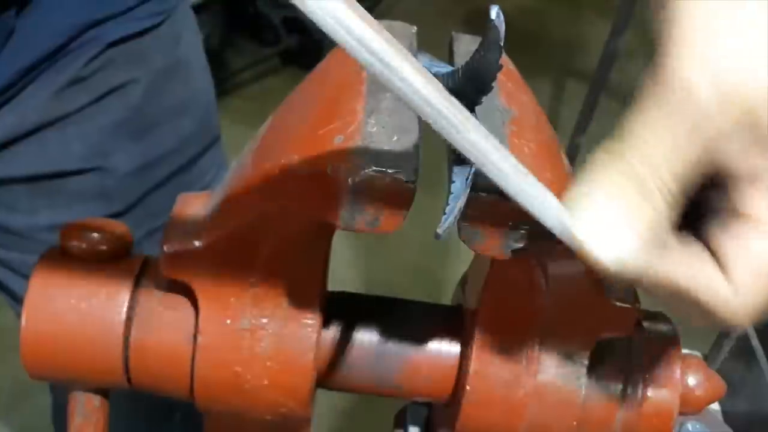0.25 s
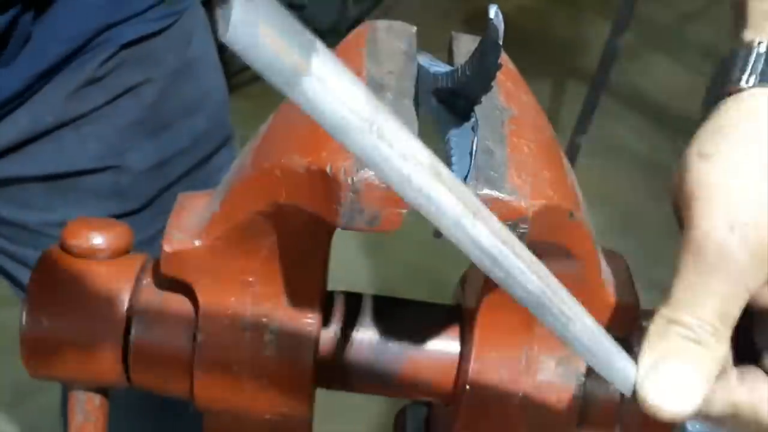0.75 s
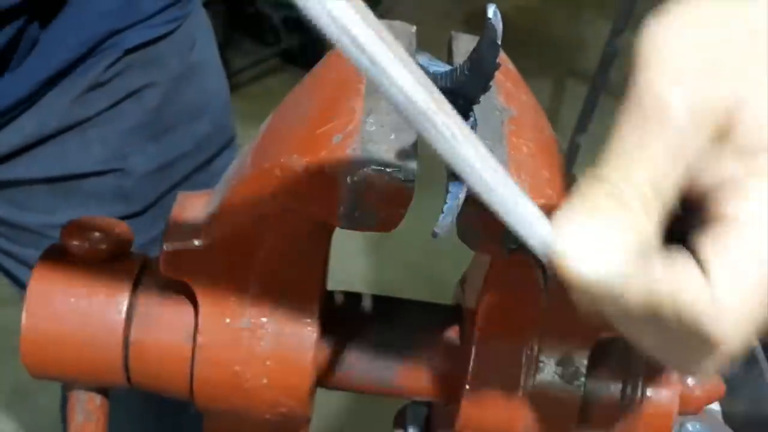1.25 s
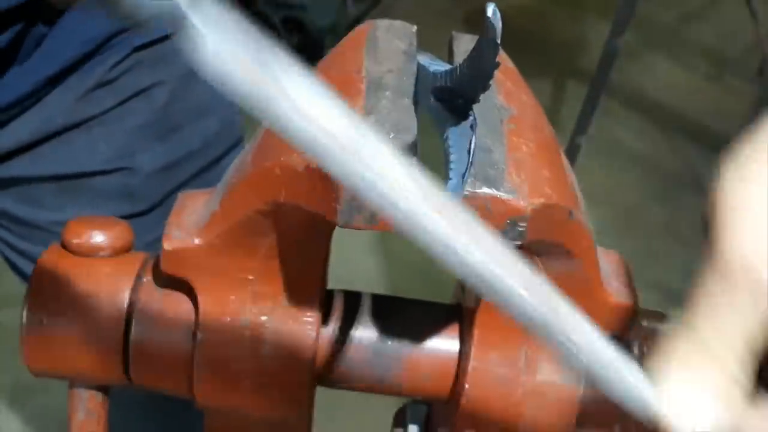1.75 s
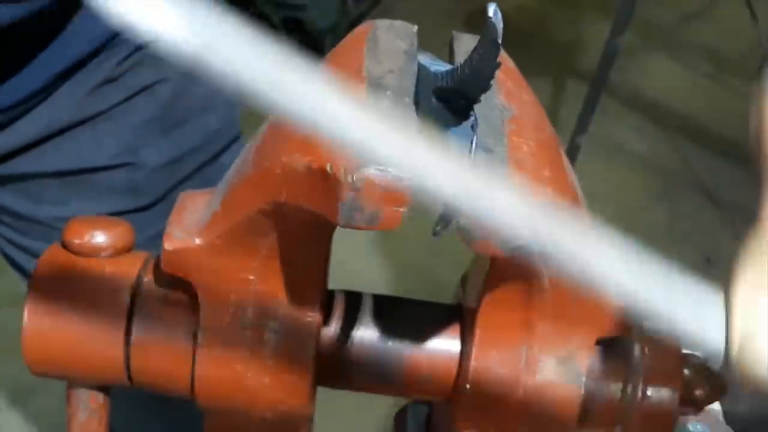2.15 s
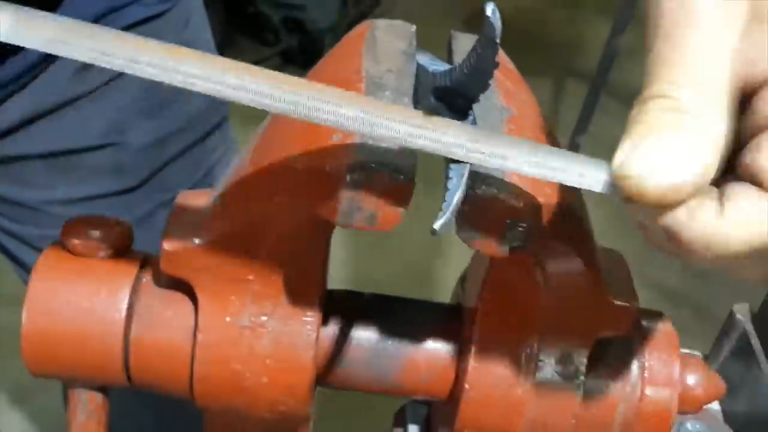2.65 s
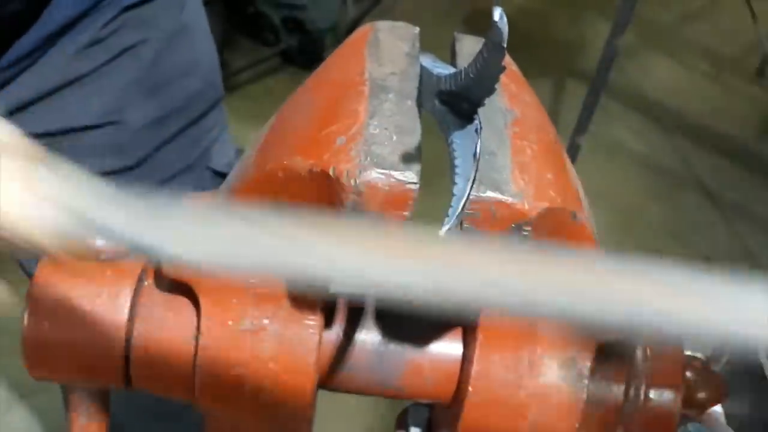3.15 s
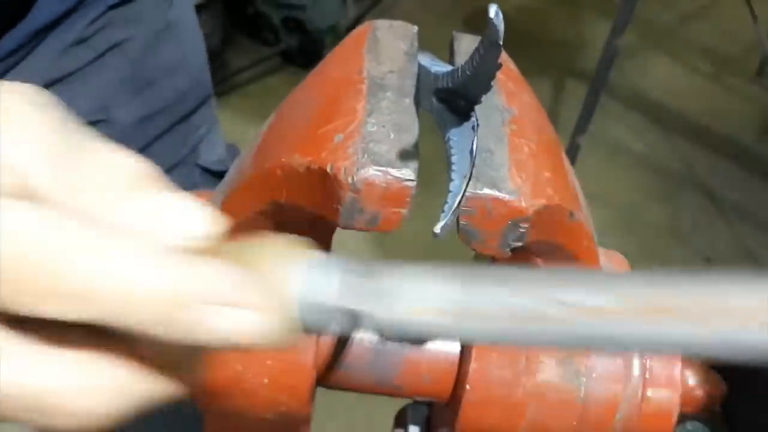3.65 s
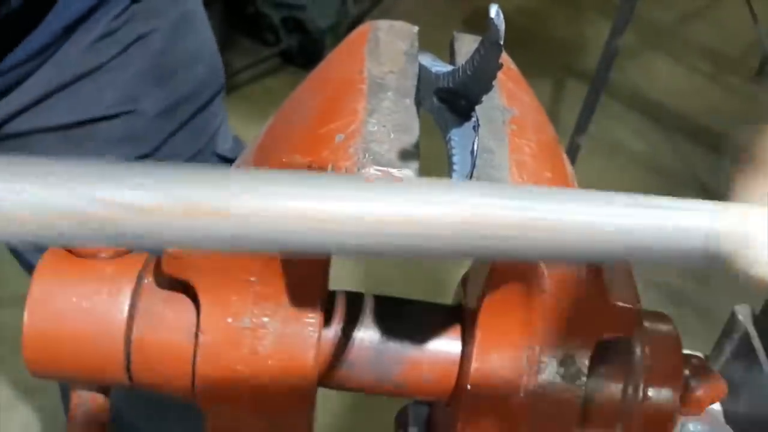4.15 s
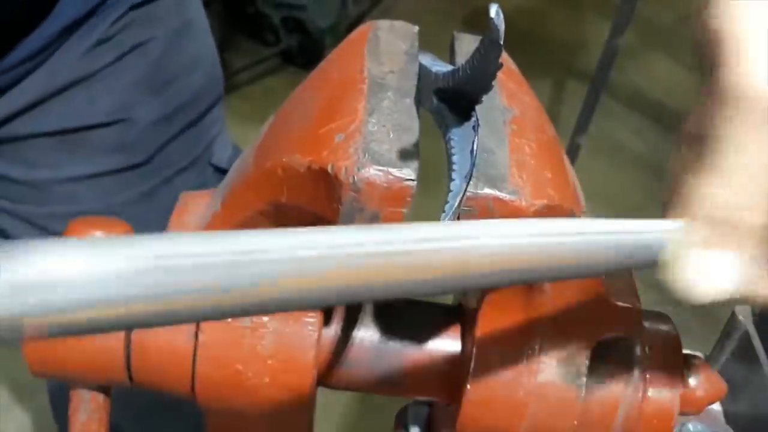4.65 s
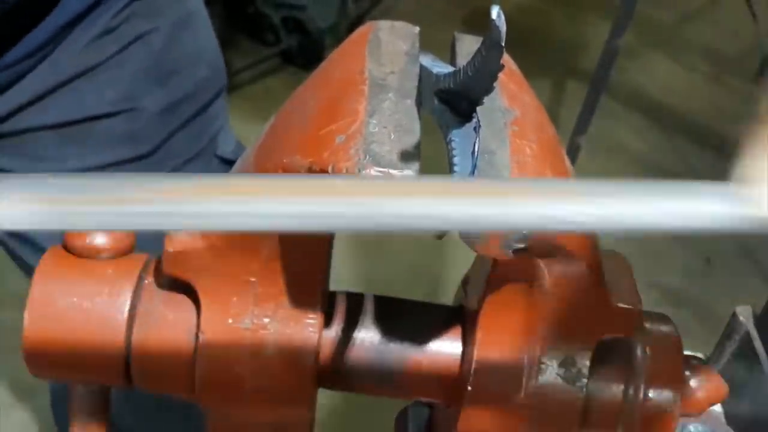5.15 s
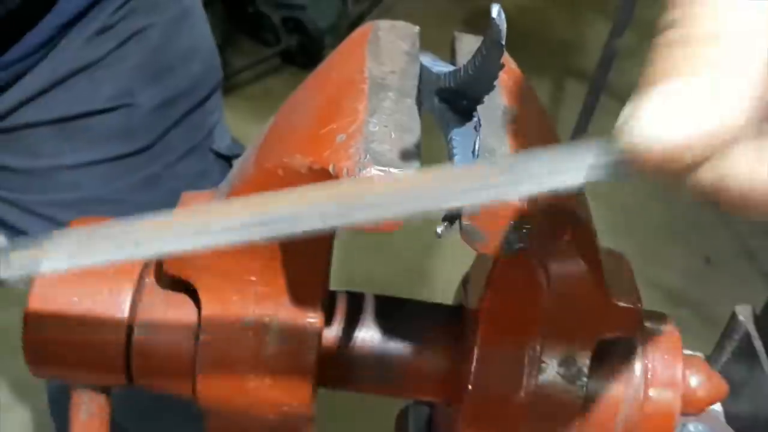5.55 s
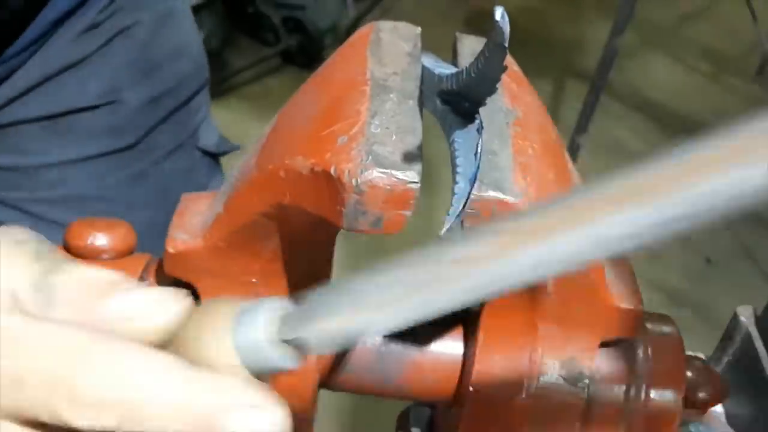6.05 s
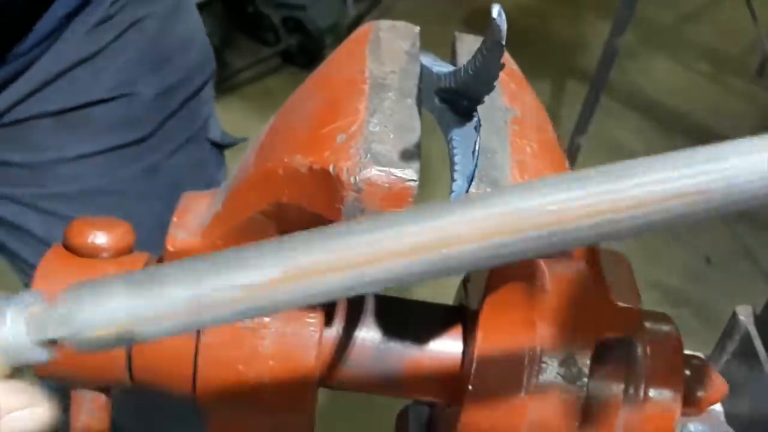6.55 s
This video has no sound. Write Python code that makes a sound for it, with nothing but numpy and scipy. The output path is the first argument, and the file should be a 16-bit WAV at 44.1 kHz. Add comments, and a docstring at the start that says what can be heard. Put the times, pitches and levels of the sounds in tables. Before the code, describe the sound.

Metal filing heard close up: bright, ringing, uneven rasps in a brisk back-and-forth rhythm, loud for the first two seconds. After a short lull come weaker, more widely spaced strokes, several turning into piercing whistling squeals, with muffled bumps against the microphone. Near the end rougher scrapes return, mixed with squeal and buzz. Short room echo and a faint steady shop rumble.

```python
"""A workshop: a round steel file is pushed and pulled over a small iron casting clamped in a bench vise.
Each stroke is a train of uneven tooth bites that excites the resonant modes of file and iron.
On some strokes the cut locks into a buzzing stick-slip chatter or a high self-excited squeal.
The file ticks as it lands on the iron, and jolts shake the microphone with low thumps.
Soft filtered noise makes the shop's rumble, and decaying noise its echo."""
import sys
import numpy as np
from scipy import signal
from scipy.fft import rfft, irfft
from scipy.io import wavfile
from scipy.ndimage import uniform_filter1d, minimum_filter1d

SR = 44100
rng = np.random.default_rng(int(sys.argv[2]) if len(sys.argv) > 2 else 0)


def persist_wave(psi):
    """Save psi, clipped to +-1, as 16-bit WAV."""
    counts = np.round(np.clip(psi, -1, 1) * 32767).astype(np.int16)
    wavfile.write(sys.argv[1], SR, np.atleast_2d(counts).T)


def linear_from_db(decibels):
    """Turn decibels (scalar or array-like) into linear amplitude factors; 0 gives 1."""
    return 10 ** (np.asarray(decibels, float) / 20)


N = 299439


def rms_one(x):
    """Normalization: scales a signal to unit root-mean-square."""
    return x / np.sqrt(np.mean(x ** 2) + 1e-20)


def drift(rate_hz):
    """Low-passed random modulation: twice-smoothed noise of spread about 1, its extremes softly limited."""
    knots_per_s = 400
    knots = rng.standard_normal(int(N / SR * knots_per_s) + 200)
    r = np.exp(-2 * np.pi * rate_hz / knots_per_s)
    smooth = signal.lfilter([1], [1, -2 * r, r * r], knots)
    slow = rms_one(smooth[198:])
    limited = 1.6 * np.tanh(slow / 1.2)
    return np.interp(np.arange(N) / SR * knots_per_s, np.arange(len(slow)), limited)


def coloured(x, points):
    """Linear filtering: multiplies the spectrum by a curve of (Hz, dB) points on a logarithmic axis."""
    hz = np.fft.rfftfreq(N, 1 / SR) + 1
    at_hz, level_db = np.transpose(points)
    curve_db = np.interp(np.log(hz), np.log(at_hz), level_db)
    return irfft(rfft(x) * linear_from_db(curve_db), N)


def resonate(x, hz, width_hz):
    """Damped oscillator: a two-pole resonance with unit gain at its peak, its width set by the damping."""
    r = np.exp(-np.pi * width_hz / SR)
    poles = [1, -2 * r * np.cos(2 * np.pi * hz / SR), r * r]
    return signal.lfilter([(1 - r * r) / 2, 0, (r * r - 1) / 2], poles, x)


def rumble():
    """Broadband background: stationary noise with a bass-heavy spectrum and a slightly unsteady level."""
    # Spectrum of the shop. Each row: frequency in Hz, relative level in dB.
    shop_spectrum = [(15, -64), (25, -30.5), (235, 4), (513, -15.5), (603, -10), (728, -25.5),
                     (1250, -23.5), (1390, -24.5), (1920, -24.5), (2320, -21), (15800, -36.5)]
    noise = rms_one(coloured(rng.standard_normal(N), shop_spectrum))
    return linear_from_db(-43.5 + 1.0 * drift(24)) * noise


def iron(x, wander_scale_db, favoured_hz, boost_db):
    """Modal superposition: all modes ring, those near the favoured pitch most, as the contact moves."""
    # Modes of file and casting. Each row: frequency in Hz, width in Hz, gain in dB.
    modes = [(749, 6, -10), (907.6, 17.7, -10), (1190, 21, -16.5), (1430, 65, -9.5), (1530, 21.5, -6.5),
             (1698, 9.9, -7.5), (1790, 8.2, -20), (2036, 5.2, -1), (2190, 11, 1.5), (2460, 28, -9),
             (2856, 26, -16), (3235, 35, -0.5), (3620, 21, 0.5), (3660, 20, -12.5), (3906, 56, 0.5),
             (3898, 70, 7), (4074, 122, 4), (4238, 62, 3.5), (4650, 105, -17.5), (4860, 290, -3.5),
             (5052, 33, 3.5), (5180, 65, -17.5), (5100, 10, -33), (6100, 40, -10), (6180, 160, -6),
             (6480, 110, -7), (7300, 48, -9), (7900, 24, 6), (8100, 31, -2), (9600, 11, -17.5),
             (11820, 67, -12), (14300, 740, -28)]
    out = np.zeros(N)
    for hz, width_hz, db in modes:
        wander_db = wander_scale_db * (0.87 * drift(10.8) + 0.74 * drift(32))
        near_db = boost_db * np.exp(-((hz - favoured_hz) / 120) ** 2)
        out += linear_from_db(db) * resonate(x * linear_from_db(wander_db + near_db), hz, width_hz)
    return out


def touches(crack_s=0.0012, ring_db=10):
    """Impact excitation: an impulse rings two broad resonances and a crack of noise rings the modes."""
    # File lands on iron. Each row: time in seconds, strength in dB.
    landings = [(0.104, -20), (0.52, -28), (2.2269, -18), (4.1854, -26), (4.6128, -10.5), (4.8392, -27),
                (5.1805, -27), (5.5677, -26), (6.4895, -19)]
    t, ticks, envelope = np.arange(N) / SR, np.full(N, 1e-12), np.zeros(N)
    for s, db in landings:
        ticks[round(s * SR)] = linear_from_db(db)
        envelope += (t >= s) * linear_from_db(db) * np.exp(-np.abs(t - s) / crack_s)
    crack = envelope * rng.standard_normal(N) + 1e-12
    tick = linear_from_db(26.0) * resonate(ticks, 5600, 180) + linear_from_db(30) * resonate(ticks, 4500, 230)
    ring = iron(crack, 0.67, 5160, boost_db=16.5)
    return tick + linear_from_db(-28) * crack + linear_from_db(ring_db) * ring


def pressure():
    """Contact force envelope: strokes press in, hold and lift off; gives their sum and the leading stroke."""
    # Strokes. Each row: start, press, hold and lift in seconds, full level in dB.
    strokes = [(0.108, 0.016, 0.12, .1, -33.5), (0.191, 0.085, 0.065, .12, -7),
               (0.411, 0.028, 0.088, 0.031, -19.5), (0.587, 0.025, 0.08, .11, -6.5),
               (0.763, 0.034, 0.061, 0.054, -15), (0.919, 0.066, 0.023, 0.13, -5),
               (1.089, 0.034, 0.041, 0.062, -15.5), (1.252, 0.036, 0.06, .09, -7.5),
               (1.416, 0.05, 0.023, .08, -12), (1.552, 0.04, 0.078, 0.2, -10),
               (1.736, 0.047, 0.037, 0.075, -19.5), (1.874, 0.035, 0.075, 0.22, -13),
               (2.27, 0.13, 0.033, 0.13, -20), (2.477, 0.024, 0.098, 0.17, -27.5),
               (2.66, 0.089, 0.058, 0.12, -20.5), (3.054, 0.037, 0.021, 0.58, -29),
               (3.457, 0.013, 0.11, .3, -30), (3.826, 0.01, 0.12, 0.17, -26.5),
               (4.193, 0.068, 0.049, 0.14, -8), (4.608, 0.0077, .005, 0.14, -12),
               (4.861, 0.053, 0.038, .13, -11.5), (5.18, 0.028, .14, 0.38, -31),
               (5.554, 0.071, 0.083, .13, -15.5), (5.91, 0.086, 0.041, 0.16, -23.5),
               (6.215, 0.055, 0.064, 0.16, -16.5), (6.476, 0.013, 0.068, .1, -23.5),
               (6.536, 0.037, 0.068, 0.15, -11.5)]
    press_db, press_curve = 25.5, 1.335     # a stroke swells from so far below
    lift_db, lift_curve = 47, 1.063         # and has sunk so far after its lift
    start, press, hold, lift, db = np.transpose(strokes)[:, :, None]
    step = 40     # samples between envelope points
    age = np.arange(0, N + step, step) / SR - start
    swell_db = press_db * np.clip(1 - age / press, 0, 1) ** press_curve
    sink_db = lift_db * np.maximum((age - press - hold) / lift, 0) ** lift_curve
    level_db = np.maximum(np.where(age < 0, -120, db - swell_db - sink_db), -120)
    at = np.arange(N) / step
    force = np.interp(at, np.arange(age.shape[1]), linear_from_db(level_db).sum(axis=0))
    return force, level_db.argmax(axis=0)[at.astype(int)]


def rasp(bites_per_s=7000, spread_db=2.5, modes_db=6.0):
    """Random impulse excitation: teeth bite in clumps with uneven force, and each stroke has its own colour."""
    # Spectrum of the bites. Each row: frequency in Hz, relative level in dB.
    bite_spectrum = [(400, -81), (700, -24.5), (1400, -24), (2300, -1), (3000, -2), (3500, -2),
                     (4200, -2.5), (5300, -19), (5900, -31.5), (7500, -4.5), (8400, -1.5), (9800, -27),
                     (10800, -49), (12500, -9), (14000, -14), (15500, -16)]
    # Colour of each stroke in order. Each row: most excited pitch in Hz, low grind and treble weights in dB.
    stroke_colours = [(4130, -17.5, -27), (4400, -13, -21), (3850, -14, -18.5), (4290, -12.5, -13.5),
                      (3830, -10.5, -16), (4080, -14, -15), (4080, -11.5, -16.5), (4070, -16.5, -14),
                      (3760, -16.5, -18), (4260, -15, -14.5), (3710, -7.5, -17.5), (4140, -14, -14.5),
                      (4570, -10, -10.5), (2200, -6.5, -14), (9600, -11, -11), (4050, -9.5, -10),
                      (3240, -11, -21), (4900, -10, -8), (4040, -14, -19), (3700, -7.5, -17.5),
                      (3440, -16, -18), (6870, -11, -23), (5190, -13.5, -7.5), (4860, -10.5, -15),
                      (5400, -17, -10.5), (4120, -6, -12), (4300, -11.5, -14)]
    hiss_db, hiss_follows = -5.5, 0.21     # hiss over the treble; share of the force in dB it gains on top
    force, stroke = pressure()
    colour = np.array(stroke_colours, float)[stroke].T
    pitch_hz, low_db, treble_db = uniform_filter1d(colour, size=400)

    sizes = linear_from_db(spread_db * np.minimum(rng.exponential(1, N), 5)) * rng.choice([-1, 1], N)
    struck = rng.random(N) < bites_per_s / SR
    clumps = linear_from_db(2.77 * drift(40))
    bites = force * sizes * struck * clumps + 1e-12
    ringing = rms_one(iron(bites, 5.0, pitch_hz, boost_db=7))
    body = rms_one(coloured(bites, bite_spectrum)) + linear_from_db(modes_db) * ringing

    def split(edge_hz, kind):
        """Band-pass filtering: one band of the body at unit level."""
        return rms_one(signal.sosfilt(signal.butter(4, edge_hz, kind, fs=SR, output="sos"), body))

    low = linear_from_db(-9 + 6.8 * drift(17.0)) * split(1600, "low")
    low += linear_from_db(-2.5 + 3.77 * drift(5.2)) * split([1600, 3400], "band")
    # patches of the middle come and go
    mid = linear_from_db(-6.0 + 4.9 * drift(20)) * split([3400, 4500], "band")
    mid += linear_from_db(-6.0 + 1.04 * drift(64)) * split([4500, 5850], "band")
    hiss = linear_from_db(hiss_db) * (force / force.max()) ** hiss_follows * split(10000, "high")
    treble = split([5850, 10000], "band") + hiss
    streaks_db = 3.0 * drift(21.1)     # the treble comes in streaks
    mix = linear_from_db(low_db) * low + mid + linear_from_db(treble_db + streaks_db) * treble
    return np.sqrt(np.mean(force ** 2)) * mix


def workshop_echo(x):
    """Diffuse reverberation: convolution with exponentially decaying noise, dull in the treble."""
    t60_s, cut_hz = 0.36, 9500
    t = np.arange(int(.8 * SR)) / SR
    tail = rng.standard_normal(len(t)) * linear_from_db(-60 * t / t60_s) * (t > .008)     # silent for 8 ms
    tail = signal.lfilter(*signal.butter(1, cut_hz, fs=SR), tail)
    return signal.fftconvolve(x, tail / np.sqrt(np.sum(tail ** 2)))[:N]


def chatter(wobble=0.0061, flutter_db=5.0):
    """Stick-slip: slips locked to a bending mode give harmonics of an unsteady rate; also gives its phasor."""
    # Chatters. Each row: middle in seconds, length in seconds, mean slips per second,
    # fundamental level in dB, overtone level in dB.
    bursts = [(0.325, 0.12, 1450, -28.5, -30), (0.646, 0.061, 1360, -26, -13),
              (0.989, 0.11, 1390, -26.5, -22.5), (1.312, 0.1, 1380, -32, -14), (1.5, 0.13, 1480, -32, -52),
              (1.638, 0.097, 1380, -32, -10.5), (1.961, 0.07, 1400, -36, -6), (3.943, 0.15, 1830, -37, -36),
              (4.243, 0.051, 1590, -29.5, -36), (4.332, 0.11, 1340, -31.5, -25),
              (4.668, 0.074, 1340, -36, -40), (4.939, 0.075, 1364, -27.5, -12),
              (5.284, 0.013, 1866, -15, -40), (5.667, 0.12, 1824, -19, -10),
              (6.012, 0.13, 1850, -31.5, -31), (6.296, 0.083, 1836, -20, -13.5),
              (6.614, 0.11, 1840, -23, -17)]
    # How the body passes the overtones. Each row: frequency in Hz, gain in dB.
    body_gain = [(2800, -20), (3650, 0.5), (4150, -.5), (5350, -15.5), (5650, 0.5), (7300, -16)]
    full_mix_db = -28.5     # a fundamental above this mixes fully with the squeal
    t, out, cycle = np.arange(N) / SR, np.zeros(N), np.zeros(N, complex)
    unsteady = np.cumsum(1 + wobble * drift(63.6)) / SR
    flutter = [linear_from_db(flutter_db * drift(44)) for multiple in range(4)]
    for middle, length, rate, first_db, over_db in bursts:
        passed_db = np.interp(rate * np.arange(2, 5), *np.transpose(body_gain))
        levels_db = [first_db, *(over_db + passed_db)]
        near = np.abs(t - middle) < 1.5 * length
        swell = np.exp(-(2 * (t[near] - middle) / length) ** 4)
        turn = np.exp(2j * np.pi * rate * unsteady[near])
        cycle[near] += swell * linear_from_db(min(first_db - full_mix_db, 0)) * turn     # weak chatter mixes less
        for k, db in enumerate(levels_db):
            out[near] += swell * linear_from_db(db) * flutter[k][near] * (turn ** (k + 1)).imag
    return out, cycle


def jolts():
    """Transient shaking: bursts of lumpy low noise rise and decay as age times a falling exponential."""
    # Shakes of the microphone. Each row: start in seconds, level at the crest in dB, time to the crest in ms.
    shakes = [(0.612, -21.5, 12), (0.971, -30, 8.9), (1.29, -22, 9.3), (1.308, -33, 8.2), (1.96, -37.5, 10),
              (3.143, -25, 7.7), (3.161, -35, 4.2), (3.505, -20, 4.8), (3.531, -21, 8.3),
              (3.899, -13.5, 9.6), (3.93, -16, 4.9), (5.237, -30.5, 11), (5.273, -21, 9.1),
              (5.318, -20, 5.3), (6.015, -30, 5.9), (6.03, -28, 2.3), (6.301, -39, 5.9)]
    t, swell = np.arange(N) / SR, np.zeros(N)
    for s, db, ms in shakes:
        age = np.maximum(t - s, 0) / (ms / 1000)
        swell += linear_from_db(db) * age * np.e * np.exp(-age)
    lumps = coloured(rng.standard_normal(N), [(20, -15), (70, -4.5), (130, 4.5), (300, -2), (800, -12.5),
                                              (2000, -14), (5000, -36.5), (15000, -31)])
    return swell * rms_one(lumps)


def squeal(cycle, wobble=0.00143, flutter_db=3.2):
    """Self-excited oscillation: nearly pure tones, with sum and difference tones while the cut chatters."""
    # Squeals of the iron's high modes. Each row: start, rise and hold in seconds, mean pitch in Hz, level in dB.
    tones = [(0.636, 0.029, 0.018, 8250, -14), (2.704, 0.043, 0.0059, 8100, -23.5),
             (2.736, 0.043, 0.025, 9600, -28), (3.073, 0.047, 0.053, 8170, -12),
             (3.464, 0.022, 0.09, 8213, -8), (3.838, 0.014, 0.073, 8284, -7),
             (3.921, 0.014, 0.046, 8140, -13.5), (5.213, 0.024, 0.047, 8130, -10.5),
             (5.276, 0.017, 0.068, 8185, -12.5), (5.567, 0.034, 0.017, 8380, -8.5),
             (5.922, 0.021, 0.09, 8380, -10.5), (5.996, 0.013, 0.029, 8412, -11),
             (6.231, 0.014, 0.0072, 8350, -10), (6.288, 0.019, 0.0072, 8130, -10.5),
             (6.55, 0.04, 0.0093, 8270, -17.5)]
    # Mixing with the chatter. Each row: multiple of squeal, multiple of chatter, mean level in dB.
    sidebands = [(1, -1, -9.5), (1, 1, -21.5), (2, -1, -16)]
    # Weaker modes that sing along. Each row: frequency in Hz, width in Hz, mean level in dB under the squeal.
    companions = [(6650, 60, -27), (9600, 32, -30), (9700, 50, -41.5), (11490, 45, -38),
                  (13900, 200, -33.5)]
    rise_db, sag_db_per_s, dies_db_per_s = 34, 29, 603     # before, during and after the hold
    t, one, two = np.arange(N) / SR, np.zeros(N, complex), np.zeros(N, complex)
    unsteady = np.cumsum(1 + wobble * drift(43.7)) / SR
    for start, rise, hold, hz, db in tones:
        near = (t >= start) & (t < start + .3)
        full = t[near] - start - rise     # seconds since full level
        level_db = db + rise_db * np.minimum(full / rise, 0)
        level_db -= sag_db_per_s * np.clip(full, 0, hold)
        level_db -= dies_db_per_s * np.maximum(full - hold, 0)
        turn = np.exp(2j * np.pi * hz * unsteady[near])
        one[near] += linear_from_db(level_db) * turn
        two[near] += linear_from_db(level_db) * turn ** 2     # the octave, heard only through the sidebands

    sides = np.zeros(N, complex)
    for m, k, db in sidebands:
        mixer = cycle if k > 0 else cycle.conj()     # sum or difference tone
        sides += linear_from_db(db + 3.5 * drift(30)) * (one, two)[m - 1] * mixer
    grit = rms_one(signal.lfilter([1], [1, -.94], rng.standard_normal(N)))     # teeth roughen the tone
    shaken = np.abs(one) * rng.standard_normal(N) + 1e-12
    along = np.zeros(N)
    for hz, width_hz, db in companions:
        evened = resonate(shaken, hz, width_hz) * np.sqrt(SR / (np.pi * width_hz))     # same power at any width
        along += linear_from_db(db + 4.9 * drift(18)) * evened
    return linear_from_db(flutter_db * drift(68)) * (one + sides + linear_from_db(-16.5) * grit * one).imag + along


def scene():
    """Superposition: filing with its echo, jolts and the shop rumble."""
    buzz, cycle = chatter()
    filing = buzz + squeal(cycle) + touches() + rasp()
    return (filing + linear_from_db(-13) * workshop_echo(filing) + jolts() + rumble())[None]


def band_limit(x):
    """A steep low-pass at the top of the band."""
    return signal.sosfilt(signal.butter(12, 15910, fs=SR, output="sos"), x)


def record(dry, ceiling_db=0.0):
    """Peak limiting: a fast smoothed gain holds the peaks, then a steep low-pass cuts the top."""
    room_db = np.minimum(ceiling_db - 20 * np.log10(np.abs(dry) + 1e-9), 0)
    gain = linear_from_db(uniform_filter1d(minimum_filter1d(room_db, size=161), size=121))
    cut = signal.cheby2(16, 60, 15950, fs=SR, output="sos")
    finished = signal.sosfilt(cut, gain * dry)
    return band_limit(finished)


dry = scene()
out = record(dry)
persist_wave(out)
```